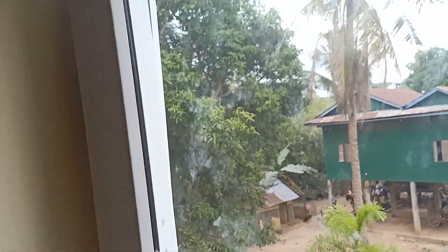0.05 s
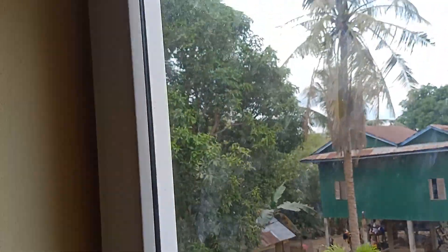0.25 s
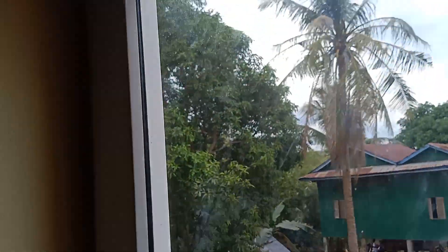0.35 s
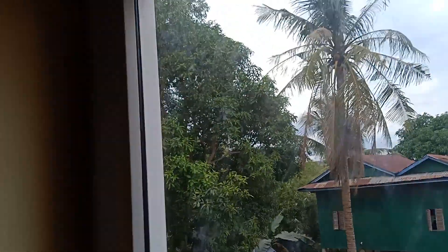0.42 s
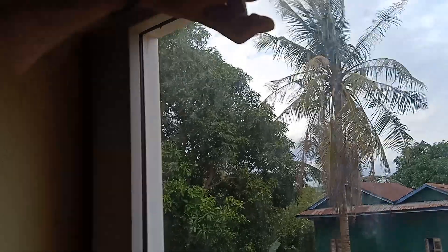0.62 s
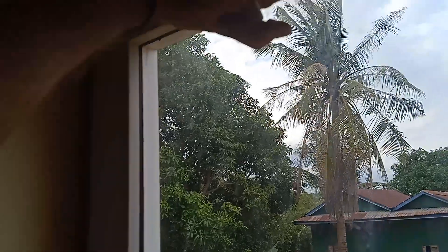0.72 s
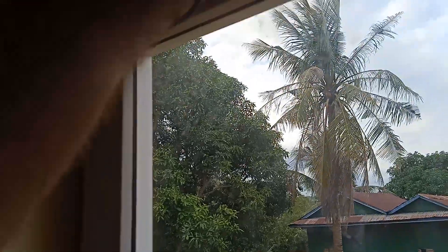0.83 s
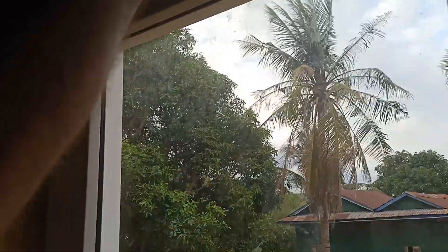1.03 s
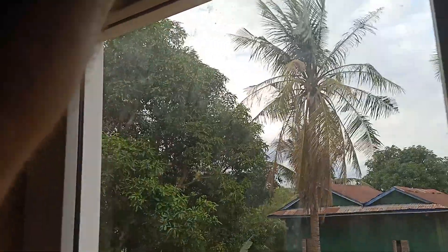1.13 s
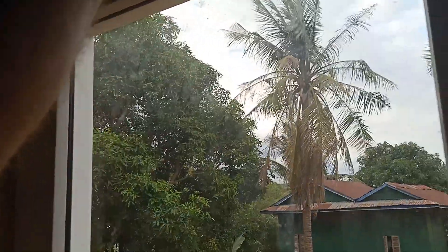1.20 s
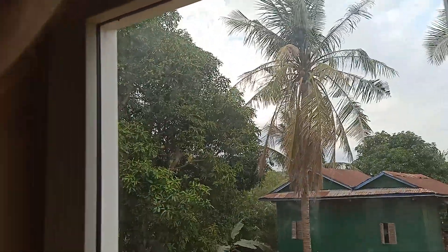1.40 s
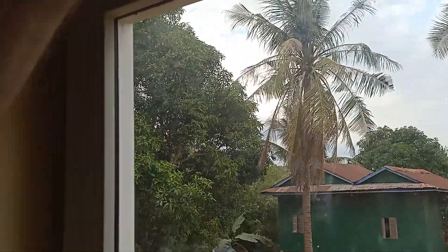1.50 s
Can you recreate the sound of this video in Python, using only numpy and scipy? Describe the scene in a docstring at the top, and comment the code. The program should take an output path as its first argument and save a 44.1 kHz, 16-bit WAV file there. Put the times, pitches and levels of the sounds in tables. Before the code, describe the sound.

A sliding window rolls briefly, with dull hand bumps on the microphone, and hits its stop with a sharp thud at about 0.2 seconds. The pane and bare room boom, fading over a second or so. The catch clicks at 0.7 seconds, then the sash scrapes softly with small clicks until about 1 second. A last quick, rattling click comes near 1.5 seconds. Faint outdoor air lies underneath.

```python
"""Sliding window in a bare room.

Close to a hand-held camera, the sash rolls against its stop with a thud; pane and room boom on.
The catch clicks, the sash scrapes a little way, and the hardware clicks and rattles.
Blows are filtered impulses and decaying modes; friction is grainy noise.
A hand bumps the camera at the start; faint outdoor air lies underneath."""
import sys
import numpy as np
from scipy import signal
from scipy.fft import rfft, irfft, next_fast_len
from scipy.io import wavfile
from scipy.ndimage import uniform_filter1d, map_coordinates

SR = 44100
rng = np.random.default_rng(int(sys.argv[2]) if len(sys.argv) > 2 else 0)


def unload_audio(sound):
    """Save the sound as a 16-bit wav file, at the path given as the first command line argument."""
    columns = np.transpose(np.atleast_2d(sound))
    # keep every value between -1 and 1, then stretch to whole-number steps
    steps = np.round(np.clip(columns, -1, 1) * 32767)
    wavfile.write(sys.argv[1], SR, steps.astype(np.int16))


N = 68355

# sash on frame: start_s, gain_db, bass_db, treble_db, t60_s, pan_db, room_db
FRAME_KNOCKS = [(.2163, -18.5, 2, -7.5, 0.013, -9, 7), (.2197, -17.5, 3, 2.5, 0.0092, -13, 1.5),
                (.2213, -10.5, 2.5, -2.5, 0.015, -3, 2), (.275, -27, -15, -17, 0.069, 5, 2.5),
                (.8818, -31.5, 6.5, 6, 0.017, -4, -11), (.900, -33, 7, -3, 0.0095, -6, -4),
                (1.459, -37.5, 2, -9, 0.032, -0.5, 3), (1.4708, -38, 10.5, 0, 0.011, -3, 4)]
# catch: start_s, gain_db, bass_db, treble_db, t60_s, pan_db, room_db
CATCH_CLICKS = [(.6942, -27.5, -4, -11.5, 0.013, -1.5, 1), (.8812, -34.5, -12, -1.5, 0.012, -6, 3.5),
                (.9754, -33.5, -8, 9, 0.0089, -10, -14), (1.467, -35, 10.5, 0, 0.026, 2, -5),
                (1.4735, -31.5, 11.5, 0, 0.018, -5, 1)]
# response of the struck bodies: freq_hz, gain_db
FRAME_COLOUR = [(40, -23), (120, 6), (280, -2), (500, 5), (850, 7), (1400, -7), (2400, -6), (3200, -18),
                (4300, -20), (5700, -8.5), (7500, -26), (10000, -33.5), (14000, -27), (16000, -48)]
CATCH_COLOUR = [(100, -15), (500, -2.5), (700, -9), (1050, 2), (1600, -3.5), (2300, 2.5), (3200, -9.5),
                (4400, -6.5), (5600, -0.5), (7500, -15), (10000, -28), (13500, -18), (16000, -20)]
# ringing parts: pitch_hz, gain_db, t60_s
FRAME_RING = [(232, -21.5, 0.05), (469, -26.5, 0.089), (726, -15, 0.016), (883, -16, 0.014),
              (1130, -32, 0.025), (1435, -25.5, 0.046)]
CATCH_RING = [(668, -30.5, 0.051), (1218, -29, 0.034), (2164, -35, 0.032), (4220, -34, 0.0072),
              (5630, -38.5, 0.026)]
SPRING_RING = [(1166, -42, 0.054), (5270, -45.5, 0.11), (5990, -45, 0.23)]
# pane and sash pushed in, swinging back: start_s, pitch_hz, gain_db, t60_s, attack_s
PANE_SWINGS = [(0.2237, 89, -5, 0.049, 0.0012), (0.8818, 215, -37, 0.029, 0.0009),
               (0.951, 192.5, -42, 0.11, 0.011), (1.471, 171.7, -30, 0.16, 0.0068)]
# two close, beating pane modes: pitch_hz, gain_db, t60_s
PANE_MODES = [(85.3, -26.5, 1.95), (95.5, -30.3, 1.74)]
# other low modes of pane and room: pitch_hz, gain_db, t60_s
BOOM_MODES = [(61.8, -36.5, 1.67), (115.4, -35, 1.44), (129.6, -35.5, 1.07), (146, -41, 1.1),
              (151, -43.5, 1.73), (181.4, -40.5, 2.42), (198, -38, 0.9), (236.2, -37.5, 0.75),
              (282.7, -43.5, 1.29), (388.4, -43, 0.93)]
# friction of rollers, track and seal: time_s, level_db
ROLL_LEVELS = [(0, -45.5), (.1, -54), (.2, -53.5), (.225, -46), (.26, -100)]
TRACK_LEVELS = [(.68, -100), (.72, -63.5), (.82, -58.5), (.88, -41.5), (.92, -53.5), (.965, -43.5),
                (.99, -52), (1.04, -101)]
SEAL_LEVELS = [(.68, -71), (.72, -48), (.765, -57.5), (.8, -52.5), (.87, -52), (.92, -68)]
# finger rubbing near 1 s, then the catch's high hissing ring after its last click: time_s, level_db
FINGER_AND_CATCH_HISS_LEVELS = [(.96, -89), (.985, -48), (1.01, -56.5), (1.06, -60), (1.14, -84),
                                (1.46, -93), (1.475, -54.5), (1.56, -57.5)]
# spectra of these four noises: freq_hz, gain_db
ROLL_SPECTRUM = [(40, -16), (110, -10), (300, -5.5), (800, 0.5), (1400, -4), (2500, -1.5), (3500, -17),
                 (5700, -11), (8500, -25.5), (14000, -37)]
TRACK_SPECTRUM = [(60, -7), (170, 2.5), (300, 2), (650, 2), (1300, -12.5), (2200, -8.5), (3400, -18.5),
                  (5500, -15.5), (9000, -33), (14000, -48)]
SEAL_SPECTRUM = [(400, -36), (600, -11), (700, -4.5), (800, -10), (1100, -14), (3000, -66)]
HISS_SPECTRUM = [(1500, -25), (2300, -1.5), (3600, -17), (5000, 1), (5800, 4.5), (7000, -6.5),
                 (9500, -18.5), (14000, -14)]
# ticks of rollers, and of fingers on the catch: start_s, gain_db
ROLLER_TAPS = [(0.026, -32.5), (0.085, -32.5)]
FINGER_TAPS = [(1.393, -52), (1.417, -58)]
# roller tick response: freq_hz, gain_db
ROLLER_COLOUR = [(300, -25), (1900, -11.5), (2500, 3), (3400, -17), (8000, -55)]
# hand on the right microphone port: start_s, gain_db
HAND_BUMPS = [(.0005, -8), (0.034, -25), (0.049, -15), (0.0764, -13.5)]
# outdoor air: freq_hz, gain_db
AIR_SPECTRUM = [(25, -9), (60, -7.5), (100, 0), (170, -2), (300, -12.5), (700, -14.5), (1300, -23.5),
                (2200, -14.5), (3600, -29), (5600, -24), (9000, -40.5), (14000, -37)]
# room decay: freq_hz, t60_s
ROOM_DECAY = [(100, 0.52), (200, 1.12), (400, 1.26), (800, 1.01), (2000, 1.1), (5500, 0.91), (13000, 0.68)]
# room response: freq_hz, gain_db
ROOM_COLOUR = [(60, 8), (150, 9), (380, 4), (700, 0), (2200, 5), (5500, -1.5), (13000, -3)]
# left-right likeness of diffuse sound: freq_hz, correlation
DIFFUSE_LIKENESS = [(100, 1), (250, 0.97), (500, 0.58), (1000, 0.038), (8000, 0.017)]
# left-right balance of diffuse sound: freq_hz, pan_db
DIFFUSE_PAN = [(100, -2), (500, 0), (1500, -4.5), (5000, 1.5), (12000, -4.5)]

FRAME_S, THUD_S, CATCH_S, SPRING_S = 0.2206, 0.2222, 0.6945, 1.4675
BASS_HZ, TREBLE_HZ = 346, 4880
WAVER_DEPTH, WAVER_STEP_S, WAVER_ABOVE_HZ = 0.62, 0.0496, 190
LOW_CUT_HZ, HIGH_CUT_HZ = 49, 15600


def pane_boom():
    """The pane swings; low modes of pane and room beat as they fade, the higher ones waver."""
    thud, *later = [ring(*row) for row in PANE_SWINGS]
    swings = sum(later)
    modes = np.zeros(N)
    for hz, db, t60_s in PANE_MODES + BOOM_MODES:
        wavering = 1 + WAVER_DEPTH * (hz > WAVER_ABOVE_HZ) * waver()
        modes += ring(THUD_S, hz, db, t60_s, attack_s=0.021) * wavering
    return pan(-1.5) * (thud + swings) + pan(-0.99) * modes + amp(-6.5) * room(swings)


def strikes(rows, body):
    """Each contact is an impulse and a short crunch, coloured by the body, answered by the room."""
    out = np.zeros((2, N))
    for start_s, db, bass_db, treble_db, t60_s, pan_db, room_db in rows:
        def colour_db(hz):
            bass = bass_db / (1 + (hz / BASS_HZ) ** 4)
            treble = treble_db * (1 - 1 / (1 + (hz / TREBLE_HZ) ** 4))
            return along(body, hz) + bass + treble

        force = fall(start_s, t60_s) * rng.standard_normal((3, N))
        force[::2, round(start_s * SR) + 20] += amp(8)  # clean impulse, direct and outward only
        direct, side, outward = amp(db + 8) * coloured(force, colour_db)
        width = coloured(0.77 * np.array([side, -side]), lambda hz: along([(200, -38), (1000, 3.5)], hz))
        out += pan(pan_db) * (direct + width) + amp(room_db - 4) * (room(direct) + room(outward))
    return out


def hardware_ring():
    """Frame, catch and its locking spring ring after their blows; the catch is nearer and drier."""
    frame = sum(ring(FRAME_S, *mode) for mode in FRAME_RING)
    catch = sum(ring(CATCH_S, *mode) for mode in CATCH_RING)
    spring = sum(ring(SPRING_S, *mode) for mode in SPRING_RING)
    return pan(-4.5) * (frame + catch + spring) + amp(-8) * room(frame + 0.5 * catch + 2 * spring)


def grainy_noise(levels, spectrum, grain_db, room_db):
    """Rubbing or hiss: noise on a roughened level curve; the room answers."""
    grain = unit(uniform_filter1d(rng.standard_normal(N), size=250))
    level_db = np.interp(since(0), *np.transpose(levels))
    noise = amp(level_db + grain_db * grain) * rush(spectrum)
    return noise + amp(room_db) * room(noise[0])


def ticks():
    """Rollers and fingers tick: short bursts of coloured noise."""
    bursts = sum(amp(db) * fall(s, t60_s=0.014, attack_s=0.0005) for s, db in ROLLER_TAPS)
    rollers = amp(10.5) * coloured(bursts * rng.standard_normal(N), lambda hz: along(ROLLER_COLOUR, hz))
    fingers = sum(amp(db) * fall(s, t60_s=0.015) for s, db in FINGER_TAPS) * rush(HISS_SPECTRUM)[1]
    return pan(-7) * (rollers + fingers) + room(amp(-1.5) * rollers + amp(13) * fingers)


def handling():
    """A hand on the right microphone port: dull bumps and a short rumble."""
    low_noise = rush([(30, -5.5), (75, 2.5), (140, -3.5), (400, -31), (1500, -52.5)])[1]
    rumble = amp(-36) * fall(0, t60_s=0.88) * low_noise
    bumps = sum(ring(s, hz=136, db=db, t60_s=0.018, attack_s=0.0012) for s, db in HAND_BUMPS)
    return np.array([[0.03], [1]]) * (rumble + bumps)


def room(x):
    """Bare room: early reflections off near walls, then a long tail."""
    hz, t, spectra = signal.stft(diffuse(), SR, nperseg=256)
    early_t60_s, late_t60_s = 0.14, along(ROOM_DECAY, hz)[:, None]
    early = amp(-3.5 - 60 * t / early_t60_s) / np.sqrt(early_t60_s)
    late = amp(-60 * t / late_t60_s) / np.sqrt(late_t60_s)
    colour = amp(along(ROOM_COLOUR, hz))[:, None]
    tail = signal.istft(spectra * (early + late) * colour, SR, nperseg=256)[1][:, :N]
    onset = 1 - np.exp(-since(0.00022) / 0.0032)
    response = tail * onset * np.sqrt(2 * np.log(1000) / SR)  # normalises the decay's energy
    return amp(-4.5) * signal.fftconvolve(x[None], response, axes=1)[:, :N]


def outdoor_air():
    """Faint, steady noise from all round."""
    return amp(-57.5) * rush(AIR_SPECTRUM)


def diffuse():
    """Stereo noise, alike in the bass, unrelated in the treble."""
    hz = np.fft.rfftfreq(N, 1 / SR)
    angle_rad = np.arccos(np.clip(along(DIFFUSE_LIKENESS, hz), -1, 1)) / 2
    mid, side = rfft(rng.standard_normal((2, N))) * [np.cos(angle_rad), np.sin(angle_rad)]
    return irfft(np.array([mid + side, mid - side]) * pan(along(DIFFUSE_PAN, hz)), N)


def rush(spectrum):
    """Coloured diffuse noise, rms 1."""
    return unit(coloured(diffuse(), lambda hz: along(spectrum, hz)))


def coloured(x, curve_db):
    """Minimum-phase filter with gain curve_db(hz)."""
    size = 2 * next_fast_len(N)
    cepstrum = irfft(np.log(amp(curve_db(np.fft.rfftfreq(size, 1 / SR)))), size)
    cepstrum[..., 1:size // 2] *= 2
    cepstrum[..., size // 2 + 1:] = 0
    return irfft(rfft(x, size) * np.exp(rfft(cepstrum)), size)[..., :N]


def ring(start_s, hz, db, t60_s, attack_s=0.00031):
    """One struck mode."""
    return -amp(db) * fall(start_s, t60_s, attack_s) * np.sin(2 * np.pi * hz * since(start_s))


def fall(start_s, t60_s, attack_s=0.00045):
    """Exponential attack and decay."""
    t = since(start_s)
    return amp(-60 * t / t60_s) * (1 - np.exp(-t / attack_s))


def waver():
    """Slow random curve, rms 1."""
    return unit(map_coordinates(rng.standard_normal(200), [since(0) / WAVER_STEP_S]))


def since(start_s):
    """Seconds since start_s, zero before."""
    return np.maximum(np.arange(N) / SR - start_s, 0)


def along(points, hz):
    """Interpolate (freq_hz, value) points on a log axis."""
    freqs_hz, values = np.transpose(points)
    return np.interp(np.log(hz + 1), np.log(freqs_hz + 1), values)


def pan(db):
    """Channel gains, left over right by db."""
    return amp(np.array([[0.5], [-0.5]]) * db)


def amp(db):
    """Decibels to gain."""
    return 10 ** (np.asarray(db) / 20)


def unit(x):
    """Scale to rms 1."""
    return x / np.sqrt(np.mean(x ** 2) + 1e-20)


def scene():
    """Window, hand and air."""
    roll = grainy_noise(ROLL_LEVELS, ROLL_SPECTRUM, grain_db=3, room_db=-10)
    scrape = grainy_noise(TRACK_LEVELS, TRACK_SPECTRUM, grain_db=3, room_db=1)
    seal = grainy_noise(SEAL_LEVELS, SEAL_SPECTRUM, grain_db=2.5, room_db=-0.5)
    hiss = grainy_noise(FINGER_AND_CATCH_HISS_LEVELS, HISS_SPECTRUM, grain_db=-1, room_db=2)
    contacts = strikes(FRAME_KNOCKS, FRAME_COLOUR) + strikes(CATCH_CLICKS, CATCH_COLOUR)
    window = contacts + hardware_ring() + pane_boom() + roll + scrape + seal + hiss + ticks()
    return window + handling() + outdoor_air()


def record(dry):
    """The camera thins the deep bass and keeps nothing above its band limit."""
    size = 2 * next_fast_len(N)
    low_cut = signal.butter(3, LOW_CUT_HZ, "high", fs=SR, output="sos")
    thinned = signal.sosfilt(low_cut, dry)
    passband = np.fft.rfftfreq(size, 1 / SR) < HIGH_CUT_HZ
    return irfft(rfft(thinned, size) * passband, size)[:, :N]


dry = scene()
out = record(dry)
unload_audio(out)
```